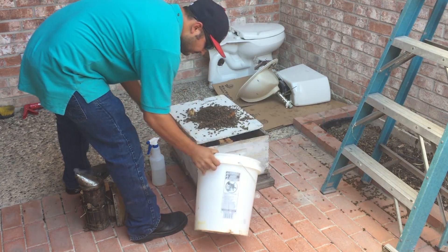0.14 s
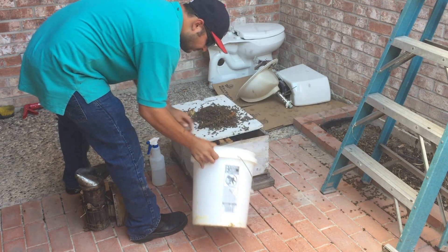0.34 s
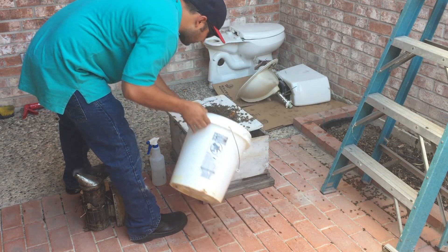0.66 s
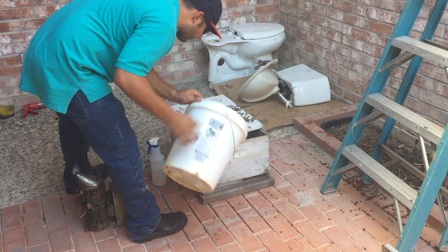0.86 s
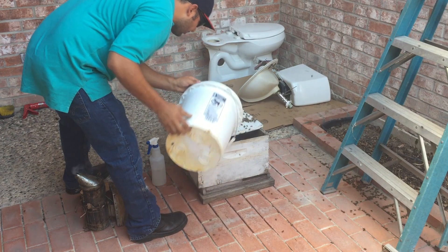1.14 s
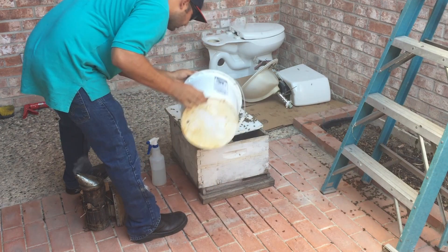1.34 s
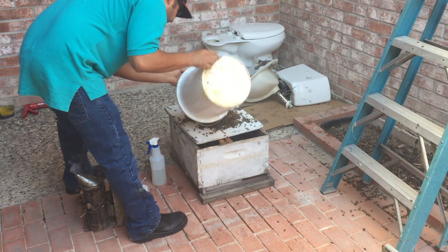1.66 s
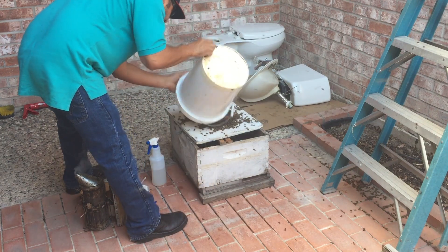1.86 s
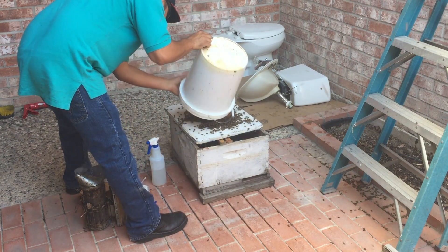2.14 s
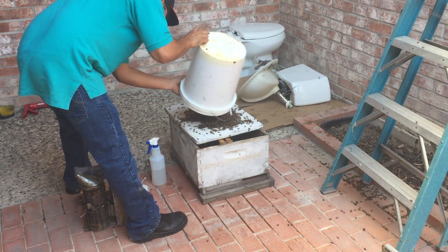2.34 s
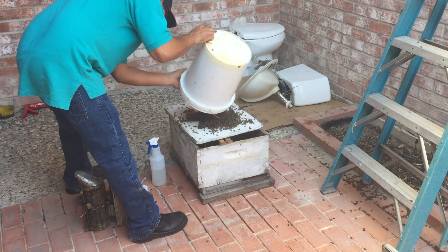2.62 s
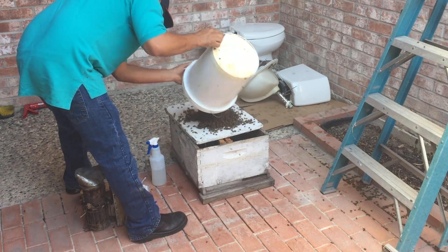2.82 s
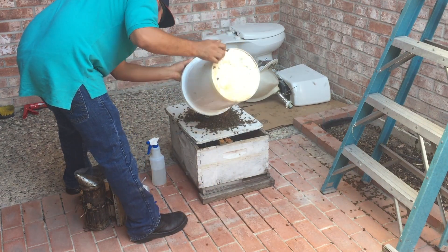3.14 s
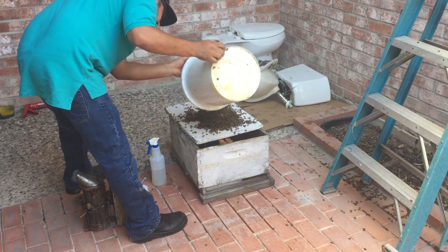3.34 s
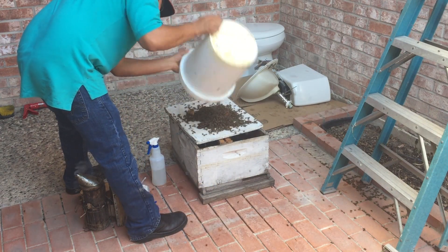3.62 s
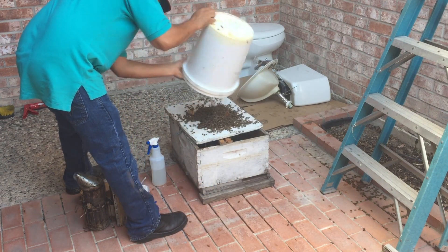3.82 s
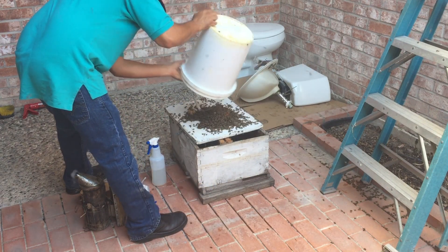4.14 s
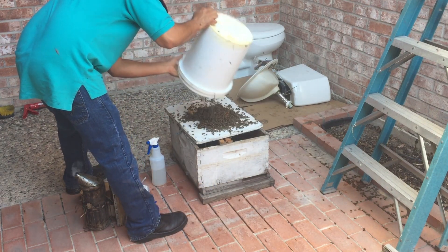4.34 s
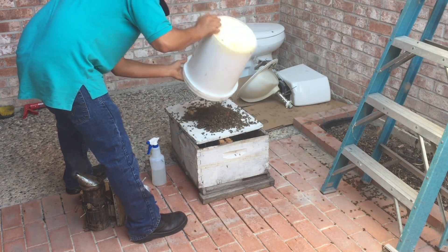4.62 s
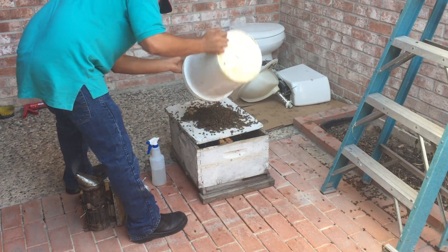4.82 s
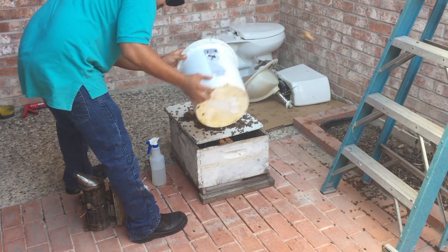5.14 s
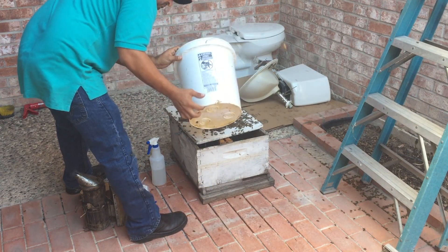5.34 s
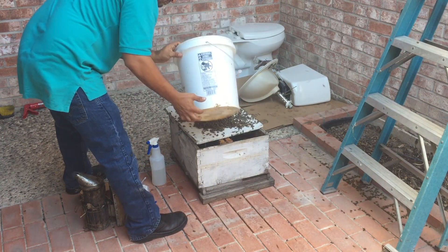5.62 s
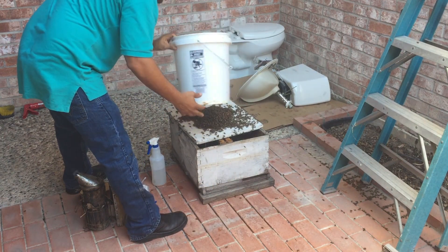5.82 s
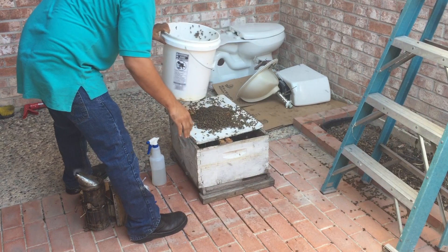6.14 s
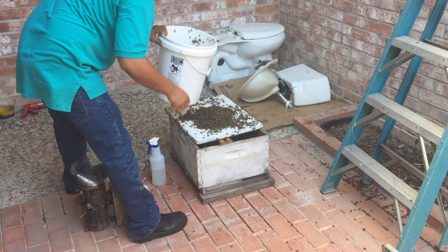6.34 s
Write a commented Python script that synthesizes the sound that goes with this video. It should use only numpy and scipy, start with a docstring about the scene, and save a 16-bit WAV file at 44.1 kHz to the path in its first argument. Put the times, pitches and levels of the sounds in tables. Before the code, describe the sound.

Outdoors in a hard brick corner, two hollow bucket knocks come within the first half second, by far the loudest events. Then a thin, wavering bee drone over breeze and light hiss, with dull puffs on the microphone, small plastic scuffs, and two gentle showers of fine pattering. A moderate double clack and a brief passing buzz finish it.

```python
"""A plastic bucket of bees is knocked twice on a brick patio: wall modes ring, the air inside booms, the bricks echo.
Puffs of air, as bursts of narrow-band noise, buffet the microphone; the rim and wire handle clack, click and scuff.
Two shakes over a wooden hive then let out surges of bees, heard as random ticks and taps on the lid.
The bucket clacks again as it is set down, and one bee veers past as a tone of falling pitch.
Throughout, a swarm hums as a sum of wavering harmonic tones, over shaped noise for breeze, open air and hiss."""
import sys
import numpy as np
from scipy import signal
from scipy.fft import rfft, irfft, next_fast_len
from scipy.io import wavfile
from scipy.ndimage import uniform_filter1d, map_coordinates

SR = 44100
rng = np.random.default_rng(int(sys.argv[2]) if len(sys.argv) > 2 else 0)


def store_pcm(level_fs):
    """Save levels as 16-bit WAV."""
    pcm = np.round(np.clip(level_fs, -1, 1) * 32767).astype(np.int16)
    wavfile.write(sys.argv[1], SR, np.atleast_2d(pcm).T)


N = 285768  # length in samples

# Blows on the plastic wall. Each row: start in seconds, level in dB, tilt in dB per octave,
# time between rebounds in seconds, change per rebound in dB.
WALL_BLOWS = [(.0098, -23.5, -1.5, .009, -3.5), (.0648, -36, 6, .012, -4), (.3143, -27, -3, .019, -3),
              (.3594, -25.5, 3, 0.018, -5.5), (1.798, -45, -0.5, 0.0067, -4), (2.1101, -45, 1, 0.008, -8),
              (5.6604, -30, 3, .014, -1), (5.846, -39.5, 2, .012, 0)]
# Modes of the plastic wall. Each row: nominal frequency in Hz, nominal level in dB, t60 in seconds.
WALL_MODES = [(348.4, -5, 0.12), (475.5, -12, 0.16), (820, -13.5, 0.041), (983, -8.5, 0.2),
              (1076, -12, 0.071), (1210, -22, 0.031), (1383, 2.5, 0.071), (1555, -1, 0.049),
              (1835, -14, 0.087), (1917, -17, 0.1), (2170, -13, 0.095), (2740, -9, 0.093),
              (2746, -15.5, 0.065), (2980, -13.5, 0.027)]
# Dense clatter between the modes. Each row: frequency in Hz, density in dB per Hz.
CLATTER_SPECTRUM = [(40, -24), (120, -1), (480, -1), (690, -3.5), (950, 0), (1600, -3.5), (2200, -5),
                    (2750, -6), (4000, -17), (4900, -25.5), (5700, -22.5), (7600, -38.5), (16000, -53)]
# Click of hard edges and the wire handle. Each row: frequency in Hz, density in dB per Hz.
CLICK_SPECTRUM = [(300, -12), (2000, 11), (4000, -38), (4900, -14), (5800, 8), (7600, -7), (9200, 5),
                  (10500, -3), (12500, 7), (16000, -5)]
# Clicks of the handle and the rim. Each row: start in seconds, level in dB.
HANDLE_CLICKS = [(0.018, -47.5), (.3745, -38), (2.1095, -59), (5.661, -46), (5.8457, -57)]
CLICK_DECAY_S = 0.003  # time to fall by a factor e

# Jolts of the base, which pump the air inside. Each row: start in seconds, peak of the air's swing in dB.
BASE_JOLTS = [(0.0105, -6), (0.3147, -5), (2.306, -41), (5.008, -38)]
# Single echoes off the nearest brick walls. Each row: delay in seconds, level in dB.
WALL_ECHOES = [(.02, -7), (.066, -14), (.09, -16.5), (.116, -17.5)]
# Flutter between two facing walls: round trip, first return, change with each further trip.
FLUTTER_S, FLUTTER_DB, TRIP_DB = 0.052, -11, -3.5
# Ring of the patio. Each row: frequency in Hz, t60 in seconds.
PATIO_DECAY = [(100, 1), (500, 0.74), (1500, 0.61), (3000, 0.61), (6000, 0.47), (10000, 0.37), (16000, 0.1)]

# Scuffs of the rim and handle under the hands. Each row: start in seconds, level in dB, centre in Hz.
HAND_SCUFFS = [(0.969, -54.5, 2600), (2.175, -51.5, 1890), (2.305, -53.5, 1900), (3.934, -49, 1390),
               (4.3162, -42.5, 1550), (4.482, -48.5, 2350), (4.650, -45, 1460), (5.84, -39.5, 1530),
               (5.958, -49, 2000)]
SCUFF_S = 0.015  # a scuff is strongest at half this time
SCUFF_WIDTH = 1140  # divided by the centre in Hz, the resonance's standard deviation in octaves

# One bee's buzz. Each row: frequency in Hz, level in dB of a harmonic there.
BUZZ_SPECTRUM = [(230, 2), (470, -0.5), (700, -5), (950, -1), (1350, -2.5), (2000, -8.5), (3000, -15),
                 (4500, -36)]
# Shakes that let out bees. Each row: time of the height in seconds, flow in dB, half length in seconds.
SHAKES = [(2.594, 3, 0.23), (4.603, 3.5, 0.27)]
# Rustle of the falling bees. Each row: frequency in Hz, density in dB per Hz.
RUSTLE_SPECTRUM = [(200, 8.5), (600, 6), (1200, 7.5), (2500, 1.5), (4000, -7), (5500, -36.5)]
# Fine hiss, also the colour of the patter. Each row: frequency in Hz, density in dB per Hz.
HISS_SPECTRUM = [(1500, -12), (4000, 2.5), (4900, -2.5), (5600, 0.5), (7000, 0), (7700, -1.5), (9300, 1),
                 (10500, -7.5), (12000, -1), (16000, -1)]
# The passing bee: time when closest, half length of the pass, level at its height before the patio's ring.
PASS_AT_S, PASS_S, PASS_DB = 6.355, 0.04, -49.5
COMING_HZ, GOING_HZ = 345, 219  # mean wingbeat before and after the turn

# Puffs of air on the microphone. Each row: time of the middle in seconds, nominal peak in dB.
AIR_PUFFS = [(.714, -28.5), (.766, -34.5), (2.875, -45), (3.482, -35), (3.633, -44), (3.71, -39),
             (4.198, -24.5), (4.217, -35), (4.306, -34.5), (4.645, -28), (4.793, -28)]
# The reference puff: nominal peak, rate of swing, half length; stronger ones are quicker and shorter.
PUFF_DB, PUFF_HZ, PUFF_S = -30, 77.6, 0.0094
# Still outdoor air. Each row: frequency in Hz, density in dB per Hz.
AIR_SPECTRUM = [(40, -57), (120, -31), (200, -0.5), (320, -8), (480, 0.5), (640, -14), (1000, -6.5),
                (1500, -10), (2500, -23), (4000, -30), (5500, -27.5)]
# Rumble of the breeze. Each row: frequency in Hz, density in dB per Hz.
RUMBLE_SPECTRUM = [(20, -36), (35, -3), (55, -2.5), (110, -4), (170, -7.5), (400, -37), (1500, -80)]
EDGE_HZ = 15850  # upper limit of the treble


def amp(db):
    """Logarithmic level: decibels become a gain of amplitude."""
    return 10 ** (np.asarray(db) / 20)


def evened(x):
    """Normalisation: scales to an rms of 1."""
    return x / np.sqrt(np.mean(x ** 2) + 1e-20)


def read(points, hz):
    """Interpolation of a spectrum on a log-frequency axis."""
    f, value = np.transpose(points)
    return np.interp(np.log(hz + 1), np.log(f + 1), value)


def colour(x, points):
    """Spectral shaping: filters by a spectrum and returns an rms of 1."""
    gain = amp(read(points, np.fft.rfftfreq(len(x), 1 / SR)))
    return evened(irfft(rfft(x) * gain, len(x)))


def noise(points, size):
    """Shaped random noise: white noise filtered to a given spectrum."""
    return colour(rng.standard_normal(next_fast_len(size)), points)[:size]


def wander(rate):
    """Slow random modulation of rms about 1, from smoothly joined random knots, rate of them a second."""
    knots = rng.standard_normal(1024)
    slow = map_coordinates(knots, [np.linspace(0, rate * N / SR, 1024)], mode="wrap")
    return np.interp(np.linspace(0, len(slow) - 1, N), np.arange(len(slow)), slow)


def add(mix, s, sound):
    """Superposition: mixes a sound in at s seconds."""
    part = mix[max(round(s * SR), 0):][:len(sound)]
    part += sound[:len(part)]


def patio(sound, wet_db, build=0.0019):
    """Reverberation: the brick corner's scattered ring builds up and dies at a rate set by frequency."""
    hz, t, z = signal.stft(rng.standard_normal(SR), SR, nperseg=256)
    decay = amp(-60 * t / read(PATIO_DECAY, hz)[:, None])
    tail = signal.istft(z * decay, SR, nperseg=256)[1]
    tail *= 1 - np.exp(-np.arange(len(tail)) / SR / build)
    response = amp(wet_db) * tail / np.linalg.norm(tail)
    response[0] += 1  # the direct sound
    return signal.fftconvolve(sound, response)


def contacts(count=3):
    """Rebound: a rocking bucket strikes again, mostly more weakly, by the row's change (s, dB, dB per octave)."""
    strikes = []
    for s, db, tilt_db, gap, rebound_db in WALL_BLOWS:
        strikes += [(s + k * gap, db + k * rebound_db, tilt_db) for k in range(count)]
    return strikes


def knocks(clatter_s=0.014, modes_db=-5, wet_db=-2, click_wet_db=-1, edge_db=-32, grain=0.56):
    """Modal excitation: each strike rings the wall's modes in its own mix, with grainy clatter and a click."""
    out, t = np.zeros(N), np.arange(SR // 4) / SR
    hz, mode_db, t60 = np.transpose(WALL_MODES)[:, :, None]
    window = np.sqrt(SR / 50)  # direct levels are the rms over a fiftieth of a second
    for s, level_db, tilt_db in contacts():
        phase, spot, grip = rng.random((3, len(hz), 1))
        # the place of the blow weights the modes; the grip of the hands detunes them a little
        strength = amp(mode_db + tilt_db * np.log2(hz / 1500) + 1.6 * spot)
        turns = hz * (1 + 0.034 * (grip - .5)) * t + phase
        decay = np.exp(-np.log(1000) * t / t60)
        ring = (strength * decay * np.sin(2 * np.pi * turns)).sum(0)
        # a harder contact tilts the clatter towards the treble
        tilted = [(f, db + tilt_db * np.log2(np.clip(f, 150, 3200) / 1500)) for f, db in CLATTER_SPECTRUM]
        rattle = np.exp(grain * evened(uniform_filter1d(rng.standard_normal(len(t)), size=80)))
        clatter = noise(tilted, len(t)) * rattle * np.exp(-t / clatter_s)
        wall = clatter / np.linalg.norm(clatter) + amp(modes_db) * ring / np.linalg.norm(ring)
        add(out, s, patio(amp(level_db) * window * wall / np.linalg.norm(wall), wet_db))
    # every contact clicks faintly; the handle and the rim have clicks of their own
    faint_clicks = [(s, db + edge_db) for s, db, _ in contacts()]
    for s, click_db in faint_clicks + HANDLE_CLICKS:
        click = noise(CLICK_SPECTRUM, len(t)) * np.exp(-t / CLICK_DECAY_S)
        add(out, s, patio(amp(click_db) * window * click / np.linalg.norm(click), click_wet_db))
    return out


def echoes(count=4):
    """Specular reflection: near walls answer once, facing walls at every round trip (delay s, dB)."""
    flutter = [((k + 1) * FLUTTER_S, FLUTTER_DB + k * TRIP_DB) for k in range(count)]
    return WALL_ECHOES + flutter


def booms(cavity_hz=223.3, swell_s=0.01, wet_db=-21, base_hz=121, base_db=-25, base_s=0.035):
    """Cavity resonance: the enclosed air swings for a few cycles and echoes; the base flexes lower down."""
    out, t = np.zeros(N), np.arange(SR // 4) / SR
    swell = (t / swell_s * np.exp(1 - t / swell_s)) ** 2.4  # reaches 1 at swell_s
    boom = swell * np.sin(2 * np.pi * cavity_hz * t)
    flex = amp(base_db) * np.exp(-t / base_s) * np.sin(2 * np.pi * base_hz * t)
    for s, peak_db in BASE_JOLTS:
        add(out, s, patio(amp(peak_db) * (boom + flex), wet_db))
        for delay, echo_db in echoes():
            add(out, s + delay, amp(peak_db + echo_db) * boom)
    return out


def scuffs(grain=0.48, wet_db=-1, skirt_db=-28, dull_hz=4000):
    """Stick-slip friction: grainy noise in one broad resonance swells and dies away."""
    out, t = np.zeros(N), np.arange(SR // 5) / SR
    hz = np.geomspace(100, 16000, 60)
    softness = 1 / np.sqrt(1 + (hz / dull_hz) ** 10)  # soft plastic radiates little treble
    for s, level_db, centre_hz in HAND_SCUFFS:
        width = SCUFF_WIDTH / centre_hz
        hump = softness * np.exp(-(np.log2(hz / centre_hz) / width) ** 2 / 2) + amp(skirt_db)
        slips = np.exp(grain * evened(uniform_filter1d(rng.standard_normal(len(t)), size=100)))
        envelope = t * np.exp(-2 * t / SCUFF_S)
        rub = noise(np.c_[hz, 20 * np.log10(hump)], len(t)) * slips * envelope
        # the direct level is the rms over twice SCUFF_S
        rub *= np.sqrt(2 * SCUFF_S * SR) / np.linalg.norm(rub)
        add(out, s, patio(amp(level_db) * rub, wet_db))
    return out


def flow():
    """Superposed surges: power of the stream of bees, which swells and ebbs with each shake."""
    t = np.arange(N) / SR
    return sum(amp(db) ** 2 * np.exp(-((t - s) / half) ** 2 / 2) for s, db, half in SHAKES)


def swarm(count=12, wingbeat_hz=231, spread=.07, waver=.045, near_db=3.5, level_db=-51, stir_db=1.15):
    """Incoherent harmonic sources: bees with wavering wingbeats dart near and far; shakes stir them up."""
    out, cycle = np.zeros(N), np.arange(1024)
    harmonic = np.arange(1, 19)[:, None]
    for rank in np.linspace(-np.sqrt(3), np.sqrt(3), count):
        hz = wingbeat_hz * (1 + spread * rank)
        phase = harmonic * cycle / len(cycle) + rng.random(harmonic.shape)
        stroke = (amp(read(BUZZ_SPECTRUM, harmonic * hz)) * np.sin(2 * np.pi * phase)).sum(0)
        turns = np.cumsum(hz * (1 + waver * wander(8))) / SR
        nearness = amp(near_db * np.minimum(wander(7), 1.6))
        out += stroke[(turns % 1 * len(cycle)).astype(int)] * nearness
    return amp(level_db + stir_db * flow()) * evened(patio(out, wet_db=-10)[:N])


def pour(ticks_per_s=2500, size_db=3, patter_db=-61, rustle_db=-54, drops_per_s=160, rest_db=-12, crawl_db=-3.5):
    """Random impacts: legs and wings tick on plastic, and falling bodies tap the lid in a soft rustle."""
    size = amp(size_db * np.minimum(rng.exponential(1, N), 4)) * rng.choice([-1, 1], N)
    chance = np.array([[ticks_per_s], [drops_per_s]]) / SR
    ticks, drops = size * (rng.random((2, N)) < chance)
    patter = colour(patio(ticks, wet_db=-2)[:N], HISS_SPECTRUM)
    rustle = colour(patio(drops, wet_db=-1.5)[:N], RUSTLE_SPECTRUM)
    falling = flow()
    # the bees that have landed keep crawling on the lid
    crawling = amp(crawl_db) ** 2 * np.cumsum(falling) / falling.sum()
    busy = falling + crawling + amp(rest_db) ** 2
    return np.sqrt(busy) * (amp(patter_db) * patter + amp(rustle_db) * rustle)


def near_bee(rolloff_db=-9, waver=0.026, swerve_s=0.0208, lag_s=0.0204):
    """Frequency-modulated harmonics: a wing tone swells as a bee nears and drops in pitch as it turns away."""
    t = np.arange(N) / SR - PASS_AT_S
    hz = GOING_HZ + (COMING_HZ - GOING_HZ) * (1 - np.tanh((t - lag_s) / swerve_s)) / 2
    turns = np.cumsum(hz * (1 + waver * wander(39))) / SR
    wings = sum(amp(rolloff_db * np.log2(k)) * np.sin(2 * np.pi * k * turns) for k in range(1, 9))
    approach = np.exp(-(t / PASS_S) ** 2 / 2)
    return patio(amp(PASS_DB) * approach * evened(wings), wet_db=-8)[:N]


def puffs(quicken_db=35, shorten_db=13):
    """Turbulent pressure: each puff pushes the microphone back and forth in a short narrow-band burst."""
    out, t = np.zeros(N), np.arange(-SR // 8, SR // 8) / SR
    for s, peak_db in AIR_PUFFS:
        # quicken_db more doubles the rate; shorten_db more halves the length
        hz = PUFF_HZ * 2 ** ((peak_db - PUFF_DB) / quicken_db)
        half = PUFF_S / 2 ** ((peak_db - PUFF_DB) / shorten_db)
        band = [(hz / 4, -40), (hz * 0.59, 0), (hz * 1.26, 0), (hz * 3, -30), (hz * 10, -90)]
        eddy = signal.hilbert(noise(band, len(t)))
        levelled = eddy.real / np.sqrt(abs(eddy) ** 2 + 0.22)  # evens out the noise's own envelope
        add(out, s + t[0], amp(peak_db) * np.exp(-(t / half) ** 2 / 2) * levelled)
    return out


def air(air_db=-55, hiss_db=-63, swell_db=3.0, breeze_db=-54.5, gust_db=2.0):
    """Modulated broadband noise: a lumpy breeze and a faint outdoor wash, under a steady hiss."""
    breeze = amp(breeze_db + gust_db * wander(22)) * noise(RUMBLE_SPECTRUM, N)
    wash = amp(air_db + swell_db * wander(9.7)) * noise(AIR_SPECTRUM, N)
    return breeze + wash + amp(hiss_db) * noise(HISS_SPECTRUM, N)


def scene():
    """Linear superposition: bucket, bees and open air sum at one microphone."""
    bucket = knocks() + booms() + scuffs()
    bees = swarm() + near_bee() + pour()
    return (bucket + bees + puffs() + air())[None]


def record(dry):
    """Band limiting: the recorder cuts the deepest bass and the top of the treble."""
    thinned = signal.sosfilt(signal.butter(5, 40, "highpass", fs=SR, output="sos"), dry)
    lowpass = signal.firwin(511, EDGE_HZ, window=("kaiser", 9), fs=SR)
    return signal.oaconvolve(thinned, lowpass[None], "same")


dry = scene()
out = record(dry)
store_pcm(out)
```